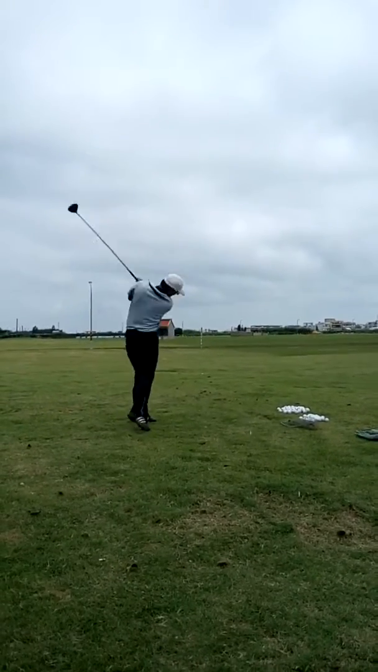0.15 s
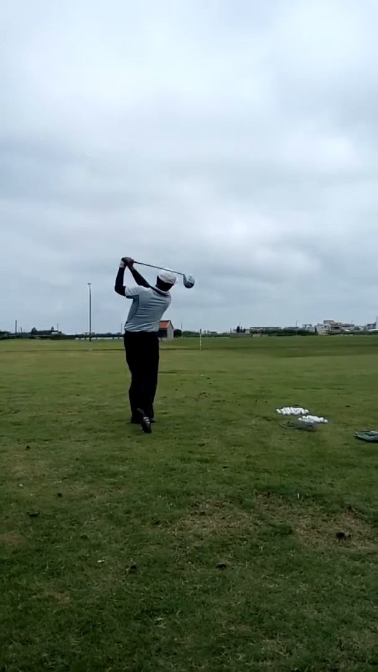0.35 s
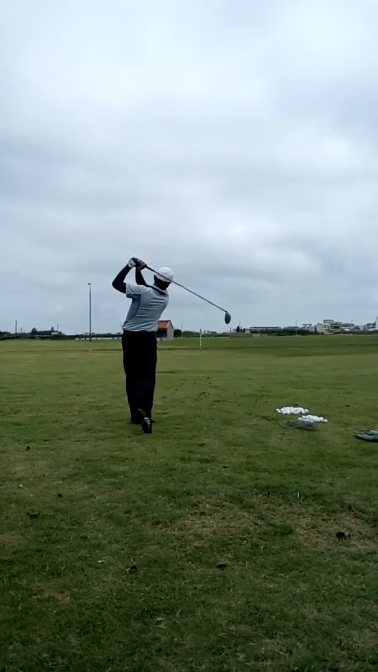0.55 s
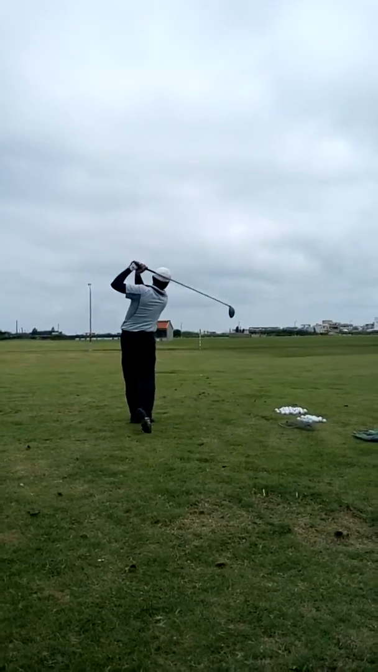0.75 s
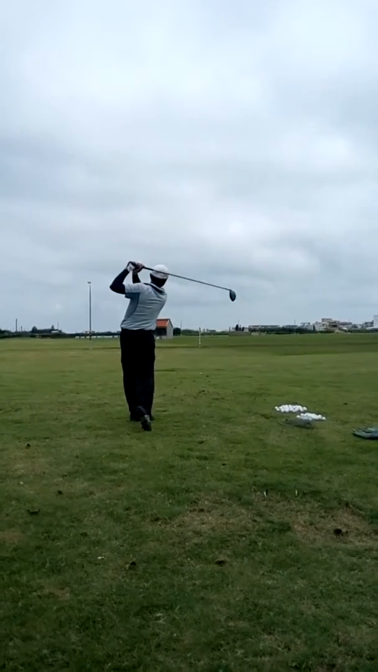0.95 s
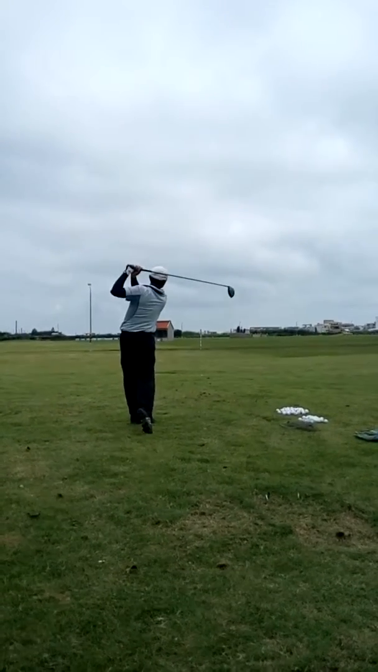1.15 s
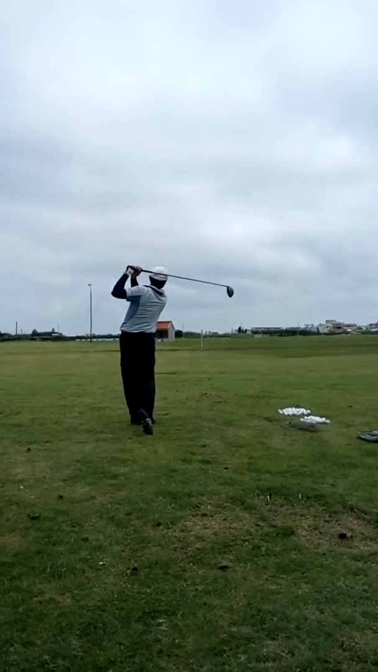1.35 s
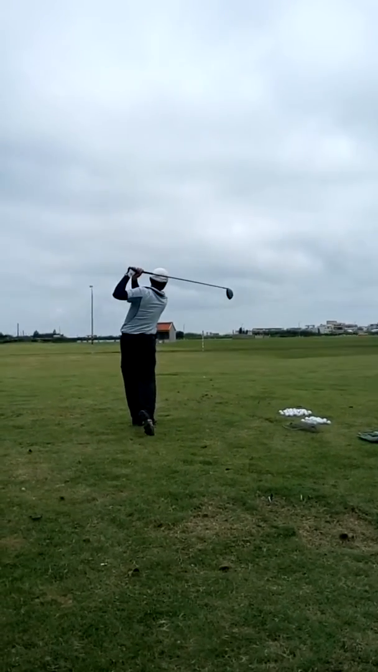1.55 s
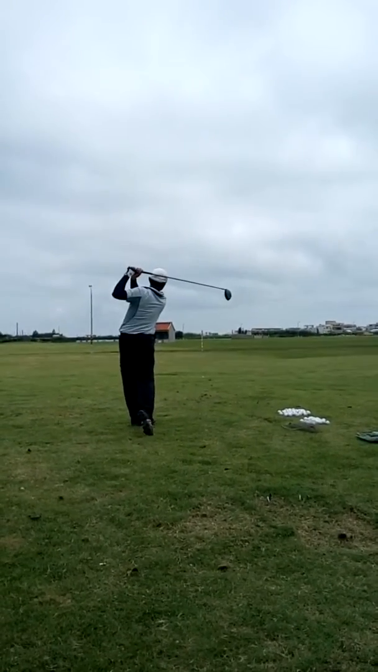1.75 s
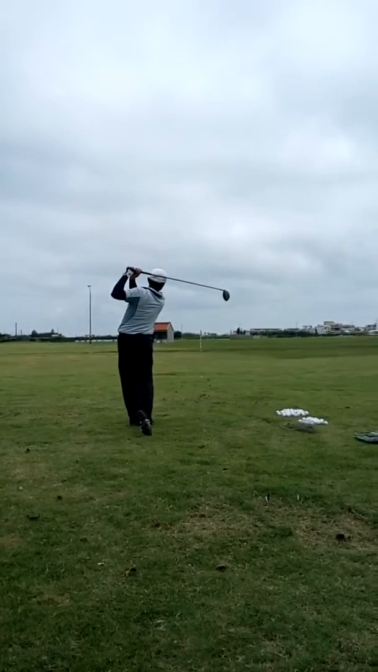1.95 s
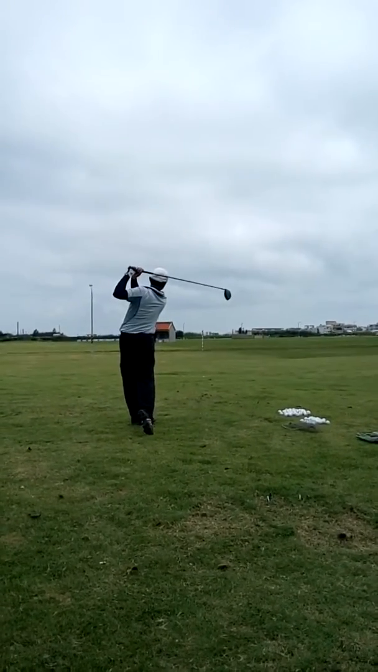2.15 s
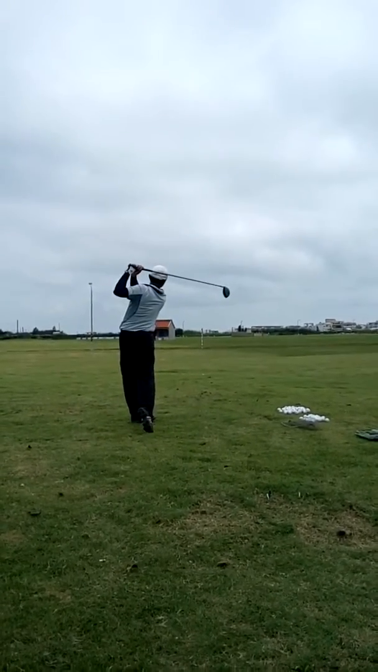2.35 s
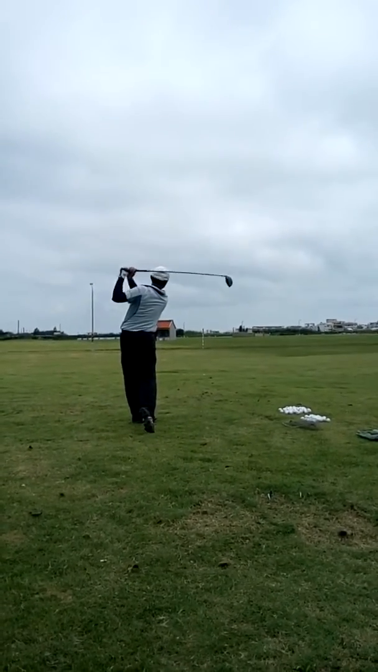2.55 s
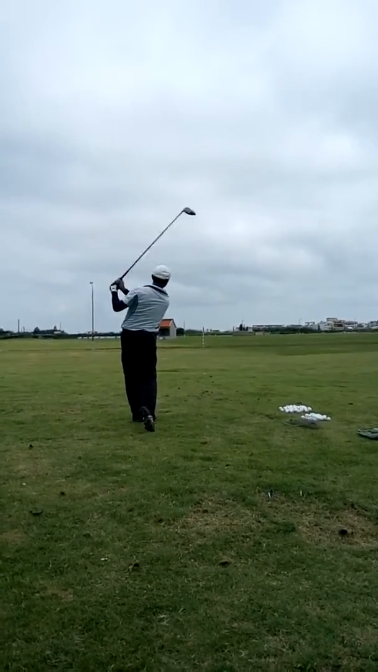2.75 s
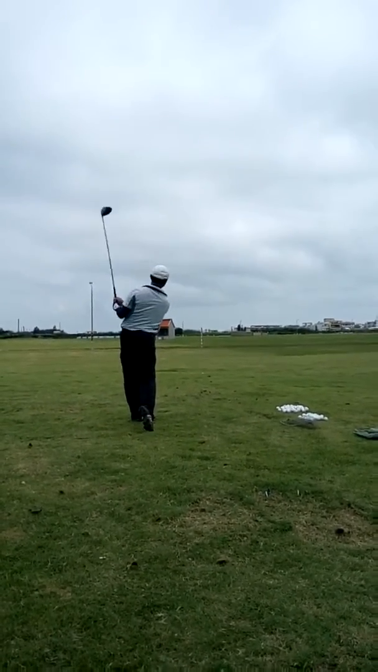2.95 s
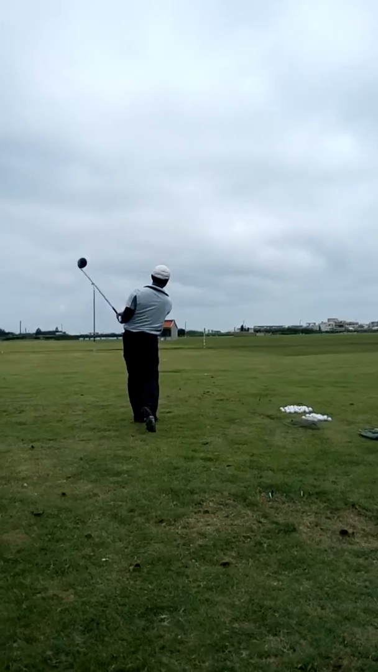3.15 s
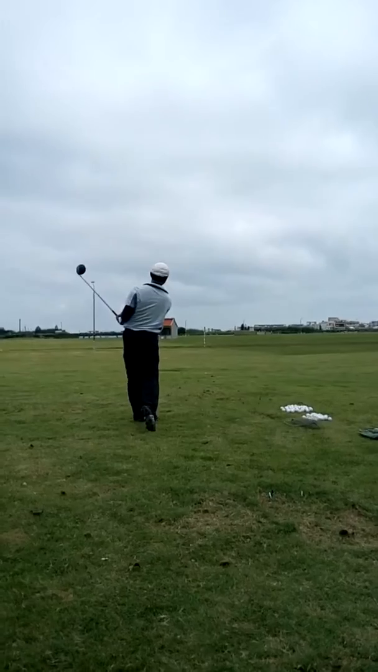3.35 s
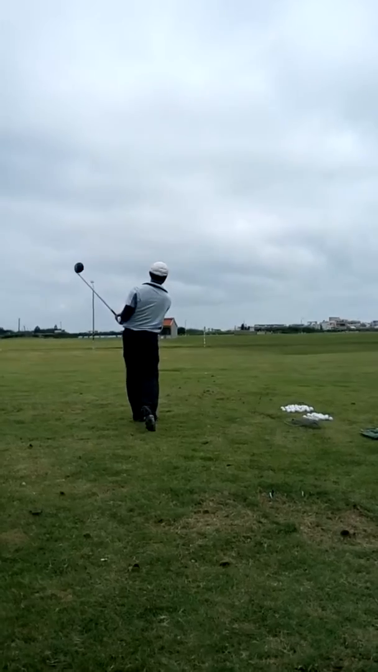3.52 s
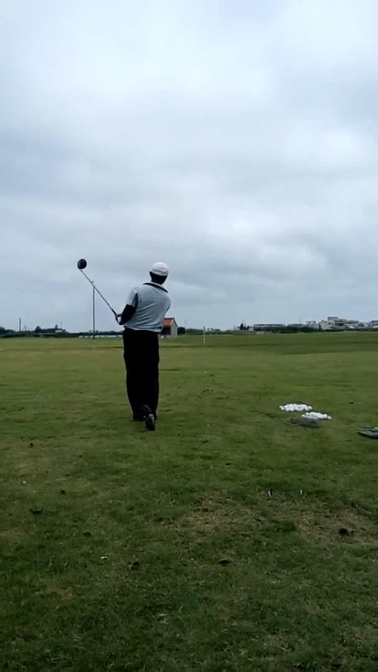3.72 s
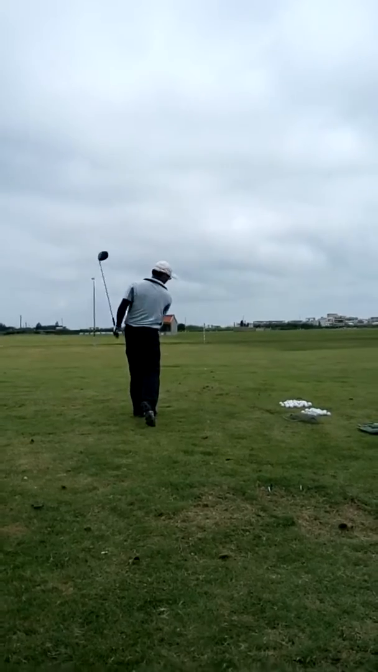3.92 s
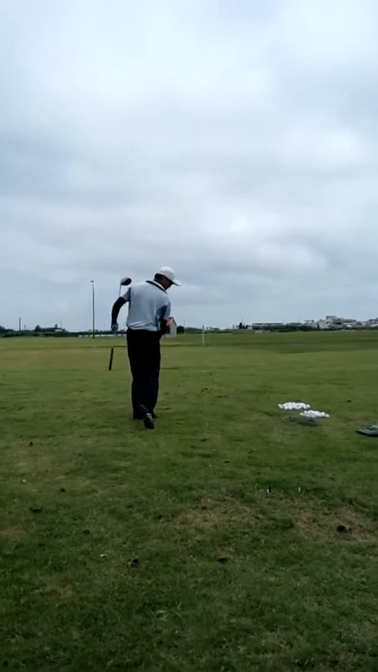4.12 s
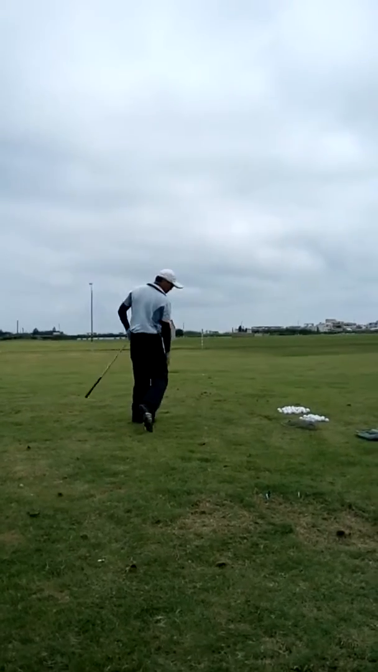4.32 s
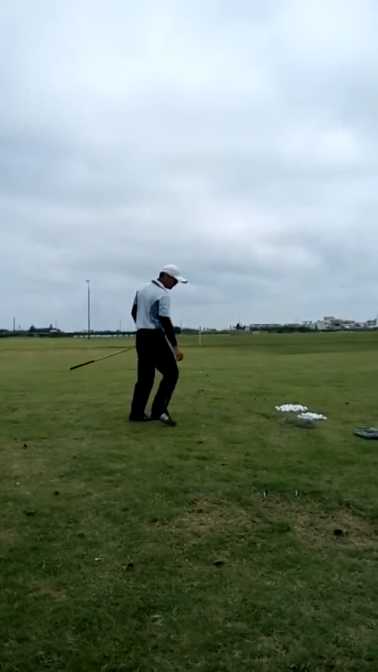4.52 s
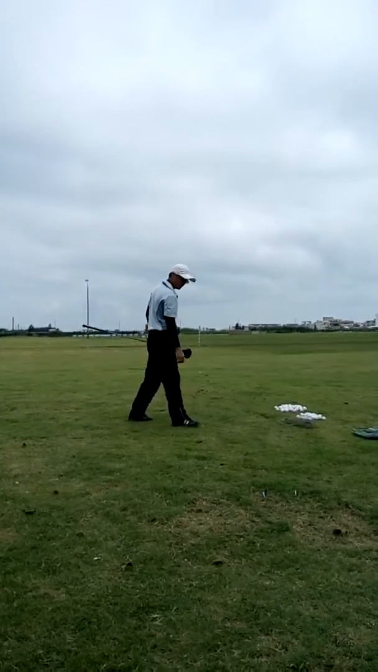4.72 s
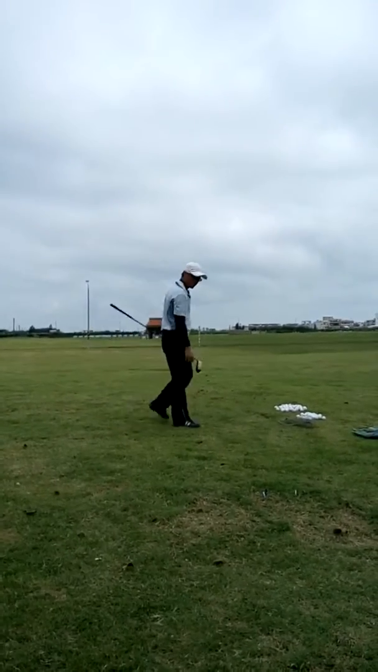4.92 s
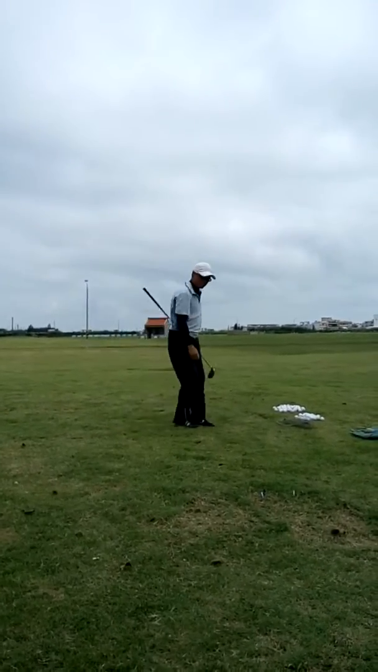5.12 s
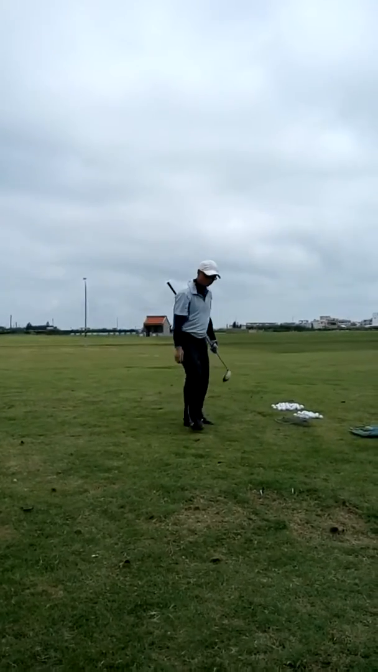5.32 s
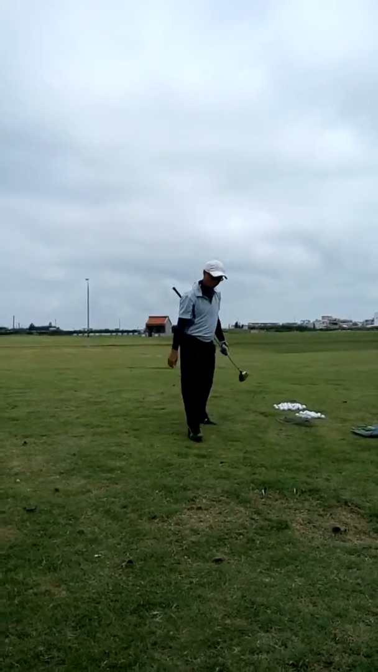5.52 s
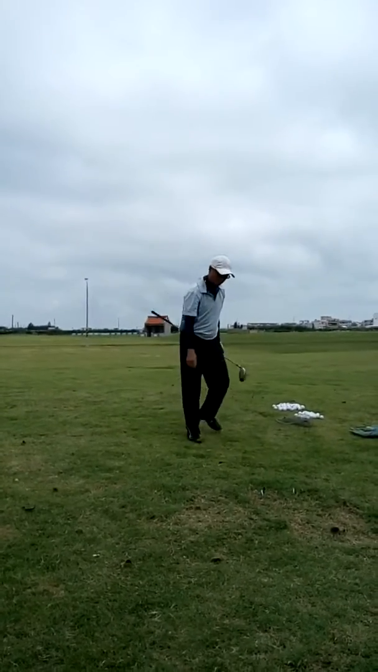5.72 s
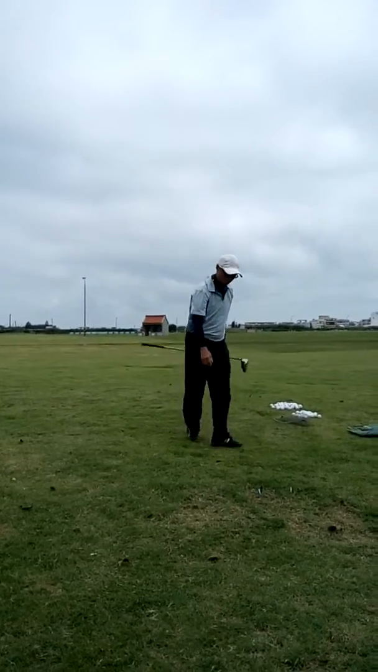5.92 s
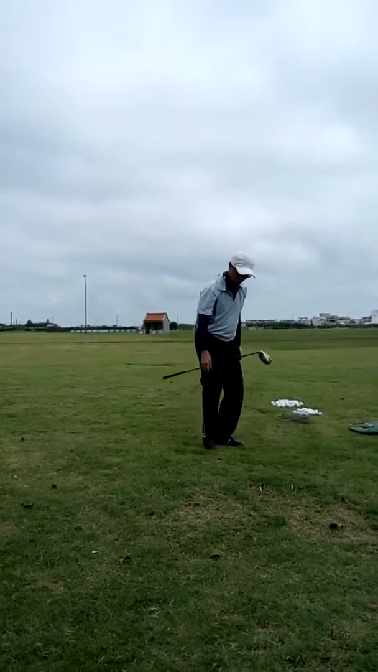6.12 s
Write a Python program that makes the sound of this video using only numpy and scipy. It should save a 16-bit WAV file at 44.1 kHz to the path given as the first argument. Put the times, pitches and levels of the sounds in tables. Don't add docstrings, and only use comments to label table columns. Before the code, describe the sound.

A fast rising club whistle ends in a very loud, sharp golf drive, its hollow head pinging and short echoes fading over open grass. Birdsong runs throughout, a rapid lark phrase about every 0.4 seconds, later buzzing and trilling, plus lower descending whistles and faint distant calls. Low gusts slap the microphone, much heavier on the left, peaking soon after the shot and then calming into irregular rumbles.

```python
import sys
import numpy as np
from scipy import signal
from scipy.io import wavfile
from scipy.ndimage import uniform_filter1d

SR = 44100
rng = np.random.default_rng(int(sys.argv[2]) if len(sys.argv) > 2 else 0)


def store_wav(level_fs):
    pcm = np.round(np.clip(np.atleast_2d(level_fs), -1, 1) * 32767)
    wavfile.write(sys.argv[1], SR, pcm.T.astype(np.int16))


def gain_from_db(level_db):
    decades = np.asarray(level_db, float) / 20
    return 10 ** decades


N = 272097

# frequency in Hz, level in dB per Hz.
AIR_SPECTRUM = [(30, -83.5), (100, -72), (300, -96.5), (600, -101), (1200, -107), (2500, -110),
                (6500, -112), (7300, -122), (8000, -138), (9000, -127), (13000, -124), (15200, -130)]
# time in seconds, level in dB.
MACHINE_LEVEL = [(5.2, -112.5), (5.5, -79), (5.95, -77.5), (6.17, -78.5)]
# start in seconds, end in seconds, pitch in Hz, level in dB.
WHINE = [(0, 3.9, 7323, -86), (3.87, 11, 7410, -82)]
WHINE_RISE_S, WHINE_WANDER_DB = .15, 1.1

# time in seconds, level in dB.
WIND_LEFT = [(0, -44.5), (.2, -33.5), (.6, -37), (.72, -38.5), (.9, -38.5), (1.02, -47.5), (1.3, -31),
             (1.7, -25.5), (1.85, -21), (2.35, -20), (2.5, -36), (3.4, -33), (4.0, -40), (4.22, -32.5),
             (4.8, -37), (5.08, -33), (5.45, -41), (6.17, -42)]
WIND_RIGHT = [(0, -45), (.45, -39.5), (.7, -49.5), (1.2, -42.5), (1.5, -41.5), (1.7, -35), (2.0, -53),
              (2.3, -40.5), (2.42, -48.5), (2.62, -37.5), (2.9, -37), (3.3, -48.5), (3.6, -41.5),
              (4.1, -48.5), (4.55, -41), (5.1, -47.5), (5.7, -43.5), (6.17, -49.5)]
# time in seconds, half length in seconds, change in dB.
SWELLS_LEFT = [(0.366, 0.026, -6), (1.793, 0.0081, 8), (1.839, 0.026, 7.5), (1.876, 0.019, -8.5),
               (1.928, 0.016, 0), (1.996, 0.064, 8), (2.038, 0.029, -10), (2.123, 0.009, 5.5),
               (2.222, 0.081, -3), (2.307, 0.046, 14), (2.372, 0.026, -7), (2.426, 0.02, 2.5),
               (2.725, 0.043, 3), (3.034, .02, 5.5), (3.085, 0.013, 8), (3.464, 0.019, 2.5),
               (1.97, .015, 8), (1.934, .012, -3), (3.185, 0.077, -4.5), (3.886, 0.048, 9),
               (5.041, 0.01006, 7.5), (5.53, 0.079, -2), (5.666, 0.05, 8.5), (5.78, .04, 4),
               (.55, 0.042, 6.5), (1.45, 0.029, 1), (3.618, 0.037, 0.5), (4.58, .03, 2), (5.296, .06, -3),
               (5.96, 0.045, 6), (6.071, .04, -6), (6.17, 0.015, 11.5)]
SWELLS_RIGHT = [(.3, 0.051, -4), (.85, 0.1, 1), (1.0, 0.065, -21.5), (3.2, 0.0498, 3.5), (3.599, .05, 4.5),
                (3.7, 0.074, -3.5), (4.62, 0.055, 5), (4.85, 0.091, -1.5), (6.0, 0.078, -0.5)]
# time in seconds, level in dB,
# treble loss in dB from 600 to 1300 Hz, direction (+1 push or -1 suck).
GUST_SLAPS = [(1.316, -27.5, -19, -1), (1.337, -37, -23, -1), (1.4, -24, -15.5, -1),
              (1.404, -34, -14.5, -1), (1.4379, -28.5, -18.5, -1), (1.496, -37, -23, 1),
              (1.639, -30.5, -31, -1), (1.651, -36.5, -26, 1), (1.788, -28, -11, -1), (1.794, -25, -20, -1),
              (1.818, -30, -8.5, -1), (1.826, -22.5, -14, -1), (1.831, -31.5, -8, 1),
              (1.843, -19, -8.5, -1), (1.853, -31.5, -17.5, -1), (1.911, -21.5, -22.5, 1),
              (1.953, -34.5, -8, -1), (1.967, -27.5, -12, 1), (1.977, -26.5, -20, 1),
              (1.984, -25, -17.5, 1), (1.992, -31.5, -12.5, -1), (2.03, -36.5, -25.5, -1),
              (2.065, -28, -20.5, -1), (2.068, -32, -20, 1), (2.097, -25.5, -21, 1), (2.118, -29.5, -23, 1),
              (2.157, -23, -17.5, -1), (2.161, -28.5, -21.5, -1), (2.182, -32, -21, -1),
              (2.187, -24, -12.5, 1), (2.207, -33, -14.5, 1), (2.237, -42, -19.5, -1), (2.253, -37, -19, 1),
              (2.268, -34.5, -14.5, 1), (2.277, -22.5, -28, 1), (2.289, -22, -16.5, -1),
              (2.294, -21, -10, 1), (2.302, -26, -13.5, -1), (2.317, -20, -17.5, 1),
              (2.325, -27.5, -15, -1), (2.338, -20.5, -16.5, -1), (2.35, -18.5, -20, 1),
              (2.416, -36, -30.5, -1)]
# time in seconds, level in dB, treble loss in dB.
STRAY_SLAPS = [(.545, -34, -22.5), (.574, -38.5, -30), (.947, -46.5, -29), (2.758, -41, -28),
               (3.018, -45.5, -30), (3.028, -42, -43), (3.054, -44, -41), (3.083, -39, -33),
               (3.274, -40.5, -24.5), (3.456, -48.5, -40), (3.848, -41, -41), (3.853, -42, -40),
               (3.875, -47, -38), (3.922, -35, -27), (4.27, -52, -27), (4.583, -35.5, -27.5),
               (4.801, -50.5, -30), (5.045, -47, -37), (5.13, -51, -34), (5.17, -50, -38),
               (5.636, -37.5, -33), (5.675, -46, -38), (5.688, -49, -40)]
# time in seconds, level in dB.
SLAPS_RIGHT = [
    (1.344, -42),
    (1.567, -46),
    (1.727, -39.5),
    (2.721, -56),
    (2.916, -53),
    (2.957, -56),
    (4.603, -54),
]
RIGHT_LOSS_DB = -27.5
WIDTH_SPREAD = .21
KNOT_S, KNOT_BEFORE, KNOT_AFTER = 0.00252, .12, -.15
SLAP_TOP_HZ, SHARP_TOP_HZ = 1830, 2700
# resonance in Hz, width in Hz, level in dB.
PORT_CAVITY = [(4250, 810, -2), (5792, 2200, -1.5)]

# start in seconds after the beat, length in seconds,
# first pitch in Hz, last pitch in Hz, level in dB.
LARK_A = [(-.044, .013, 4840, 5910, -6), (-.029, 0.0193, 5370, 4127, -3.5), (-.015, 0.011, 4100, 4011, -9),
          (0, 0.0083, 5880, 6160, 4.5), (.012, 0.048, 6220, 4305, -2.5), (.062, 0.044, 6000, 5804, -3),
          (.11, .02, 6200, 7260, -8.5), (.131, .004, 6916, 5605, -5.5), (.138, .016, 6450, 5877, 0)]
# seconds, seconds, Hz, Hz, dB.
UNDER_BUZZ = [(.066, .066, 4315, 5400, -11)]
# time in seconds after the beat, pitch in Hz, level in dB.
LARK_ARCH = [(.158, 3680, -3.5), (.175, 4048, 0.5), (.193, 4315, -5.5), (.208, 4300, -2.5),
             (.22, 3950, 2.5), (.236, 3050, 0.5)]
# beat in seconds, high notes in dB, arch in dB.
PHRASES_A = [(0.0144, -47, -52), (0.401, -46, -49.5), (0.8549, -46.5, -52), (1.251, -49.5, -52.5),
             (1.6352, -46.5, -51), (2.026, -47.5, -50.5), (2.417, -47, -49), (2.8079, -50.5, -51.5),
             (3.2015, -48, -50), (3.594, -50.5, -50), (3.9861, -48, -50), (4.3723, -50.5, -50)]
# start in seconds, length in seconds, first Hz, last Hz, level in dB.
LARK_B = [(0, 0.0075, 6500, 6900, -6.5), (.007, 0.0129, 6525, 5105, -1.5), (.021, 0.0114, 6627, 5680, 1.5),
          (.035, 0.016, 5380, 6630, 4.5), (.055, 0.0161, 6080, 5870, -8.5), (.062, 0.03, 6769, 6740, -13),
          (.088, 0.0124, 5660, 6300, -4), (.096, 0.02036, 6310, 5420, 1), (.13, 0.013, 4820, 5200, -3.5),
          (.144, 0.059, 5362, 5798, 1), (.184, 0.00831, 6751, 4800, 1), (.262, .016, 4570, 3280, -0.5)]
# seconds, seconds, Hz, Hz, dB.
FAST_BUZZ = [(.185, 0.061, 6035, 5830, 0.67), (.19, 0.08, 5140, 4890, 2.46)]
SLOW_TRILL = [(.284, .11, 3587, 3684, -1.5), (.292, 0.092, 4349, 4400, -11.5)]
CLOSING_BUZZ = [(.385, 0.047, 4090, 4308, -1.4)]
# start in seconds, level in dB, right port against that level in dB #
# (the left port gets -9), closing buzz in dB.
PHRASES_B = [
    (4.725, -51, -19, -12),
    (5.265, -49, -15.5, 4.5),
    (5.815, -50.5, -16.5, 0),
]
# time in seconds, pitch in Hz, level in dB.
WHISTLE = [
    [(-.016, 3296, -13), (.012, 3163, -9)],
    [(0, 2542, 2), (.008, 2373, -1), (.02, 2210, 3.5), (.04, 2132, 1.5), (.098, 2105, 1)],
]
# start in seconds, level in dB, right port against that level in dB # (the left
WHISTLES = [
    (3.646, -56, -11),
    (4.142, -57.5, -12.5),
    (4.489, -53.5, -11.5),
    (4.857, -53, -13),
]
# start in seconds, length in seconds, first Hz, last Hz, level in dB.
FAR_CALLS = [(.7, 0.032, 4250, 4370, -68), (.76, 0.027, 5660, 6020, -63), (1.455, 0.024, 6380, 6084, -68.5),
             (1.502, 0.024, 5650, 6060, -58.5), (1.55, 0.0478, 4860, 4840, -67),
             (4.03, 0.03985, 7000, 7150, -73), (4.14, 0.0192, 6400, 6800, -72),
             (1.927, 0.012, 4260, 4160, -57), (3.481, 0.036, 5760, 5800, -61),
             (3.543, 0.044, 2780, 2736, -64.5), (3.734, 0.04, 5245, 4990, -58.5),
             (3.885, 0.0402, 4580, 4420, -61), (3.952, 0.0309, 4410, 5060, -56),
             (5.04, 0.0614, 5880, 5769, -73.5), (5.72, 0.047, 5570, 5746, -62.5),
             (5.861, 0.02, 4180, 4830, -56), (5.874, 0.039, 4800, 5060, -59.5),
             (3.988, 0.033, 3220, 3251, -65.5)]
# seconds, seconds, Hz, Hz, dB.
FAR_TRILLS = [(1.6, 0.059, 3220, 3230, -63), (1.822, 0.0433, 5000, 5240, -50.5),
              (5.112, .07, 5330, 5015, -66)]
UNDER_FLUTTER, FAST_FLUTTER, SLOW_FLUTTER = (.9, 125), (.9, 146), (1.1, 61)  # depth, rate in Hz
FLUTTER_JITTER, WOBBLE = 1.5, .075
NOTE_SPREAD_DB, NOTE_EDGE_S, TWINKLE_DB = 1.6, .003, 4.2
LARK_RIGHT_DB, ARCH_RIGHT_DB = -19, -17.5
LARK_LAG, WHISTLE_LAG = -11, 4
NEAR_T60, FAR_T60, FAR_DB = .135, .5, -7
HEDGE_S, HEDGE_DB = .04, -5.5

# time in seconds, shaft whistle in Hz, whistle in dB, hiss in dB.
SWING = [
    (.11, 349.2, -88, -91),
    (0.141, 488, -61, -84),
    (0.164, 625, -53.5, -68),
    (0.179, 770, -44, -58),
    (.21, 785, -42, -46.5),
    (.225, 830, -48, -46),
    (.232, 796.3, -55.5, -48.5),
    (.3, 598.2, -71.5, -78),
]
HIT_S, HIT_DB = .2345, 13.5
# pitch in Hz, level in dB, time to fall 60 dB in seconds.
HEAD_MODES = [(2300, -13, 0.1), (4270, -7, 0.12), (4930, -11, 0.16), (4894, -14, 0.1), (5310, -9.5, 0.13),
              (5340, -8.5, 0.11), (5550, -4, 0.07), (5670, -9, 0.12), (5940, -1, 0.044),
              (6210, -0.5, 0.085), (6373, -7.5, 0.08), (6780, -9, .08), (6828, -12.5, 0.09),
              (7260, -22, 0.075)]
# Hz, dB, seconds.
FACE_MODES = [(8522, -17, 0.055), (9300, -20, 0.11), (9500, -24, .12), (10400, -23, .13), (9800, -25, .12),
              (11100, -29, .13), (11810, -21.5, 0.14), (11800, -22, 0.12), (12980, -20.5, .09),
              (13387, -25.5, .07), (13990, -26.5, .12), (14330, -29, .12), (14830, -31.5, .08)]
HEAD_SHARE, FACE_SHARE, FACE_DB = .5, 0.92, -3
# frequency in Hz, level in dB per Hz.
CRACK_SPECTRUM = [(130, -29), (320, -7), (900, -4), (2000, -11), (3200, -13.5), (4250, -3.5), (4900, -13),
                  (5900, 2.5), (7300, -8.5), (9000, -5), (12000, -14.5), (15300, -21.5), (17000, -37),
                  (21000, -57.5)]
# delay in seconds, left level in dB, right level in dB.
BOUNCES = [(.0016, -1.5, -11.5), (.003, -3.5, -4.5), (.0045, -4.5, -12), (.0062, -10, -13.5),
           (.012, -14, -22.5), (.016, -15, -22.5), (.023, -18, -27.5), (.026, -18, -28.5)]
SHAFT_HZ, SHAFT_DB, SHAFT_T60 = 2170, -71.5, 0.35
TAIL_T60, TAIL_SHARE = .175, .35
EDGE_HZ = 15300


def evened(x):
    return x / np.sqrt(np.mean(x ** 2) + 1e-20)


def drift(count, size):
    return evened(uniform_filter1d(uniform_filter1d(rng.standard_normal(count), size), size))


def read(points, hz):
    f, value = np.transpose(points)
    return np.interp(np.log(hz + 1), np.log(f + 1), value)


def add(mix, s, sound):
    at = round(s * SR)
    part = mix[..., max(at, 0):max(at + sound.shape[-1], 0)]
    part += sound[..., max(-at, 0):][..., :part.shape[-1]]


def resonate(x, hz, width):
    turn = np.exp(2j * np.pi * np.cumsum(hz * np.ones(len(x))) / SR)
    r = np.exp(-np.pi * width / SR)
    return 2 * (turn * signal.lfilter([1 - r], [1, -r], x * turn.conj())).real


def hum(count, hz, width):
    return evened(resonate(resonate(rng.standard_normal(count), hz, width), hz, width))


def scatter(t60, size, share=0.084):
    strength = rng.standard_normal((2, size))
    present = rng.random((2, size)) < share
    taps = strength * present * gain_from_db(-60 * np.arange(size) / SR / t60)
    return taps / np.linalg.norm(taps, axis=1, keepdims=True)


def air():
    frames, hz = N // 256 + 5, np.fft.rfftfreq(1024, 1 / SR)
    a, b, patches = rng.standard_normal((frames, 513, 2, 3)).T
    patches = evened(uniform_filter1d(uniform_filter1d(patches, 12, 1), 12, 2))
    spectrum = (a + 1j * b) * gain_from_db(read(AIR_SPECTRUM, hz)[:, None] + 3.4 * patches + 17.5)
    out = signal.istft(spectrum, nperseg=1024, noverlap=768)[1][:, :N]
    t = np.arange(MACHINE_LEVEL[0][0], N / SR, 1 / SR)
    hums = [(1880, 316, 0.5), (1180, 143, -3.0), (751.5, 180, 2.0), (2700, 422, -3)]  # Hz, width Hz, dB
    drone = sum(gain_from_db(db) * hum(len(t), f, width) for f, width, db in hums)
    add(out, t[0], drone * gain_from_db(np.interp(t, *np.transpose(MACHINE_LEVEL))))
    return out


def eddy(width_s):
    t = np.arange(-600, 2400) / SR
    bump = np.clip(1 - (t * SR / 600) ** 2, 0, 1) ** 3 / (1 + (t / width_s) ** 2)
    bass_cut = signal.butter(N=3, Wn=95, btype="high", fs=SR, output="sos")
    bump = signal.sosfilt(bass_cut, bump) * np.hanning(6000)[3000:]
    return bump / np.linalg.norm(bump)


def wind_level(wind, swells, slaps):
    t = np.arange(N // 32 + 2) * 32 / SR
    level_db = np.interp(t, *np.transpose(wind))
    level_db += sum(db * np.exp(-((t - s) / half) ** 2) for s, half, db in swells)
    level_db += sum(1.9 * np.exp(-((t - s) / 0.012) ** 2) for s, *_ in slaps)
    level_db = np.interp(np.arange(N) / SR, t, level_db) + 2.3 * drift(N, 900)
    return np.minimum(level_db, -16)


def wind_rumble(level_db):
    per_s, widths = 1500, np.geomspace(.0004, .0035, num=14)
    chance, sign = rng.random(N), rng.choice([-1., 1.], N)
    size, spread = rng.exponential(1, N), rng.standard_normal(N)
    width = 0.0019 * np.exp(-.04 * (level_db + 34.5) + WIDTH_SPREAD * spread)
    kind = np.searchsorted(np.sqrt(widths[1:] * widths[:-1]), width)
    strength = gain_from_db(level_db + 2.315 * np.minimum(size, 5) - 5.5) * np.sqrt(SR / per_s)
    train = (chance < per_s / SR) * sign * strength
    out = np.zeros(N)
    for k, width_s in enumerate(widths):
        if (kind == k).any():
            out += signal.oaconvolve(train * (kind == k), eddy(width_s))[600:N + 600]
    return out


def wind_slap(db, loss_db, push):
    slap = eddy(np.clip(-loss_db, 3, 40) / 38000)
    top_hz = SLAP_TOP_HZ + (SHARP_TOP_HZ - SLAP_TOP_HZ) * np.clip(2 + loss_db / 6.3, 0, 1)
    slap = signal.sosfiltfilt(signal.butter(N=5, Wn=top_hz, fs=SR, output="sos"), slap)
    before, after = (round(KNOT_S * SR * (.5 + u)) for u in rng.random(2))
    slap = slap + KNOT_BEFORE * np.roll(slap, -before) + KNOT_AFTER * np.roll(slap, after)
    band = signal.butter(N=2, Wn=[350, 900], btype="band", fs=SR, output="sos")
    slap = slap / np.linalg.norm(signal.sosfilt(band, slap)) * np.sqrt(0.0045 * SR)
    return np.sign(push) * gain_from_db(db + 1.0) * slap


def buffet(wind, swells, slaps):
    out = wind_rumble(wind_level(wind, swells, slaps))
    for s, db, loss_db, push in slaps:
        add(out, s - 600 / SR, wind_slap(db, loss_db, push))
    return out


def glides(rows, flutter=()):
    return [[(s, hz0, db, *flutter), (s + length, hz1, db, *flutter)] for s, length, hz0, hz1, db in rows]


def note(rows):
    s, *columns = np.transpose([tuple(r) + (0, 0) for r in rows])
    t = np.arange(s[0], s[-1], 1 / SR)
    hz, db, depth, rate = (np.interp(t, s, c) for c in columns[:4])
    jitter = FLUTTER_JITTER * uniform_filter1d(rng.standard_normal(len(t)), 300)
    beat = 2 * np.pi * np.cumsum(rate * (1 + jitter)) / SR
    wobble = WOBBLE * hz * uniform_filter1d(rng.standard_normal(len(t)), 60)
    hz = uniform_filter1d(hz, 90) + 2.5 * rate * depth * np.sin(beat) + wobble
    gate = 1 - np.clip(depth, 0, 1) * (1 - ((1 - np.cos(beat)) / 2) ** 3.0)
    gate *= gain_from_db(TWINKLE_DB * (hz / 5200) ** 2 * drift(len(t) + 400, 120)[200:-200])
    edge = np.clip(np.minimum(t - s[0], s[-1] - t) / NOTE_EDGE_S, 0, 1)
    edge = np.sin(np.pi / 2 * edge) ** 2
    return s[0], np.sqrt(2) * gain_from_db(db) * gate * edge * np.sin(2 * np.pi * np.cumsum(hz) / SR)


def song_list():
    first = glides(LARK_A) + glides(UNDER_BUZZ, UNDER_FLUTTER)
    second = glides(LARK_B) + glides(FAST_BUZZ, FAST_FLUTTER) + glides(SLOW_TRILL, SLOW_FLUTTER)
    songs = [(first, s, db, LARK_RIGHT_DB) for s, db, _ in PHRASES_A]
    songs += [([LARK_ARCH], s, db, ARCH_RIGHT_DB) for s, _, db in PHRASES_A]
    for s, db, right, buzz_db in PHRASES_B:
        songs.append((second, s, db, right))
        songs.append((glides(CLOSING_BUZZ, FAST_FLUTTER), s, db + buzz_db, right))
    songs += [(WHISTLE, *row) for row in WHISTLES]
    songs.append((glides(FAR_CALLS) + glides(FAR_TRILLS, SLOW_FLUTTER), 0, -1.5, -8))
    for s, pitch, slide, level in rng.random((70, 4)):
        hz0 = 3900 + 2700 * pitch
        chirp = glides([(0.0056, 0.013, hz0, hz0 + 1200 * (slide - .6), 0)])
        songs.append((chirp, s * N / SR, -85.5 + 6 * level, 0))
    return songs


def song_echoes():
    echoes = scatter(NEAR_T60, size=22000) + gain_from_db(FAR_DB) * scatter(FAR_T60, size=22000)
    echoes = np.pad(echoes, ((0, 0), (200, 0)))
    bank = round(HEDGE_S * SR)
    echoes[:, 200:200 + bank] += gain_from_db(HEDGE_DB) * scatter(0.96, size=4000)[:, :bank] * np.sqrt(4000 / bank / 2)
    return signal.sosfilt(signal.butter(N=4, Wn=2900, btype="high", fs=SR, output="sos"), echoes)


def birds():
    out = np.zeros((2, N))
    for notes, s, db, right_db in song_list():
        lag = WHISTLE_LAG if notes is WHISTLE else LARK_LAG
        for rows in notes:
            start, sound = note(rows)
            level_db = db + np.array([[-9], [right_db]]) + NOTE_SPREAD_DB * rng.standard_normal((2, 1))
            left, right = sound * gain_from_db(level_db)
            add(out[0], s + start, left)
            add(out[1], s + start + lag / SR, right)
    echoed = signal.fftconvolve(out, song_echoes(), axes=1)[:, :N]
    return out + gain_from_db(np.array([[-4], [-1.5]])) * echoed


def swing():
    s, *columns = np.transpose(SWING)
    t = np.arange(s[0], s[-1], 1 / SR)
    hz, whistle_db, hiss_db = (np.interp(t, s, c) for c in columns)
    whistle = hum(len(t), hz, 160)
    band = signal.butter(N=4, Wn=[400, 6900], btype="band", fs=SR, output="sos")
    hiss = rng.standard_normal((2, len(t)))
    hiss = evened(signal.sosfilt(band, hiss) + gain_from_db(-22) * hiss)
    return s[0], whistle * gain_from_db(whistle_db) + hiss * gain_from_db(hiss_db)


def blow():
    t = np.arange(9000) / SR
    modes = [(hz, db, HEAD_SHARE * t60) for hz, db, t60 in HEAD_MODES]
    modes += [(hz, db + FACE_DB, FACE_SHARE * t60) for hz, db, t60 in FACE_MODES]
    ring = sum(gain_from_db(db - 60 * t / t60) * np.sin(2 * np.pi * (hz * t + rng.random())) for hz, db, t60 in modes)
    ring *= 1 - np.exp(-t / .0003)
    log_gain = read(CRACK_SPECTRUM, abs(np.fft.fftfreq(4096, 1 / SR))) * np.log(10) / 20
    crack = np.fft.ifft(np.exp(np.conj(signal.hilbert(log_gain)))).real[:2048]
    crack /= abs(crack).max()
    shaft = gain_from_db(SHAFT_DB - 60 * t / SHAFT_T60) * resonate(rng.standard_normal(len(t)), SHAFT_HZ, 90) * 20
    return gain_from_db(-24.0) * ring + gain_from_db(2.0) * np.pad(crack, (0, len(t) - len(crack))) + shaft


def strike():
    direct = blow()
    taps = np.zeros((2, 13000))
    taps[:, 0] = gain_from_db(np.array([-2.5, .1]))
    for delay, left_db, right_db in BOUNCES:
        taps[:, round(delay * SR)] = gain_from_db(np.array([left_db, right_db])) * rng.choice([-1., 1.])
    tail = gain_from_db(np.array([[-6], [-7]])) * scatter(TAIL_T60, size=12900, share=TAIL_SHARE)
    tail += gain_from_db(-27.5) * scatter(0.28, size=12900)
    tail[1] = 0.38 * tail[0] + .8 * tail[1]
    taps[:, 100:] += tail
    taps[:, 1:] = signal.lfilter([1, -.93], [1, -.6], taps[:, 1:])
    dull = signal.sosfilt(signal.butter(N=3, Wn=7200, fs=SR, output="sos"), taps[:, 1:])
    taps[:, 1:] = np.array([[.08], [.2]]) * taps[:, 1:] + 0.6 * dull
    return gain_from_db(HIT_DB) * signal.fftconvolve(direct[None], taps, axes=1)


def port(x):
    ringing = sum(gain_from_db(db) * resonate(resonate(x[0], hz, width), hz, width) for hz, width, db in PORT_CAVITY)
    return np.array([x[0] + ringing, x[1]])


def scene():
    sky = air() + birds()
    add(sky, *swing())
    add(sky, HIT_S, strike())
    left_slaps = GUST_SLAPS + [(*row, -1) for row in STRAY_SLAPS]
    right_slaps = [(s, db, RIGHT_LOSS_DB, -1) for s, db in SLAPS_RIGHT]
    left_wind = buffet(WIND_LEFT, SWELLS_LEFT, left_slaps)
    right_wind = buffet(WIND_RIGHT, SWELLS_RIGHT, right_slaps)
    return port(sky) + np.array([left_wind, right_wind])


def whine():
    t = np.arange(N) / SR
    out = np.zeros(N)
    for start, end, hz, db in WHINE:
        rise = (.5 + .5 * np.clip((t - start) / WHINE_RISE_S, 0, 1)) * ((t > start) & (t < end))
        tone = np.sin(2 * np.pi * hz * t) + gain_from_db(-8.0) * np.sin(2 * 2 * np.pi * hz * t)
        out += gain_from_db(db) * rise * tone
    return out * gain_from_db(WHINE_WANDER_DB * drift(N, 500))


def top_cut(x):
    return signal.sosfilt(signal.butter(12, 15480, fs=SR, output="sos"), x)


def record(dry):
    clipped = np.clip(dry + whine() * gain_from_db(np.array([[-20], [6]])), -1, 1)
    softened = signal.sosfiltfilt(signal.butter(N=4, Wn=EDGE_HZ, fs=SR, output="sos"), clipped)
    return top_cut(softened * 0.888 + .1 * clipped)


dry = scene()
out = record(dry)
store_wav(out)
```